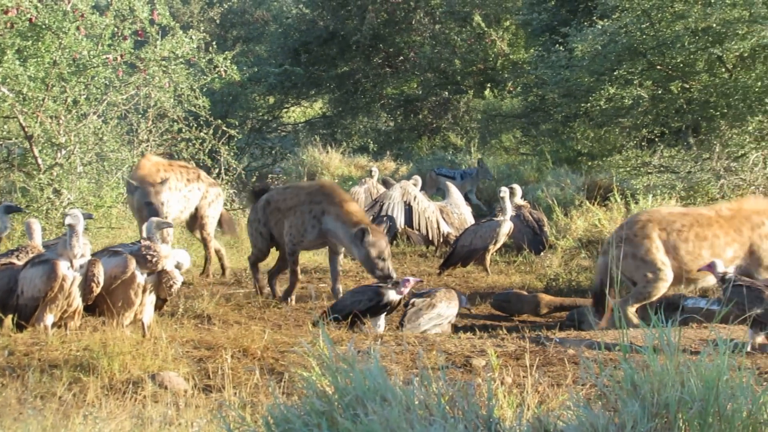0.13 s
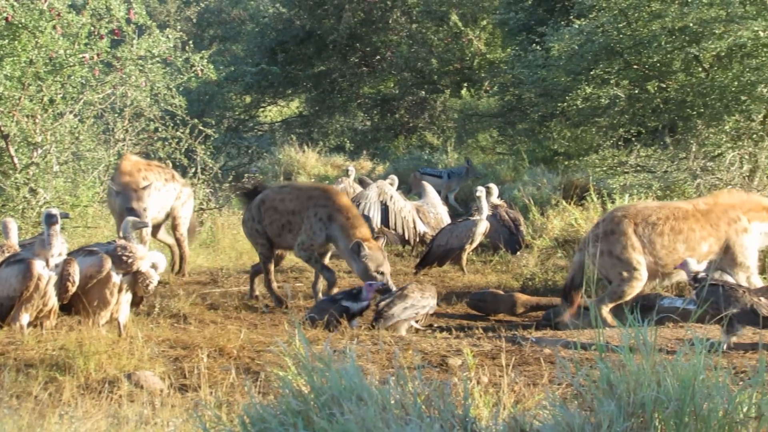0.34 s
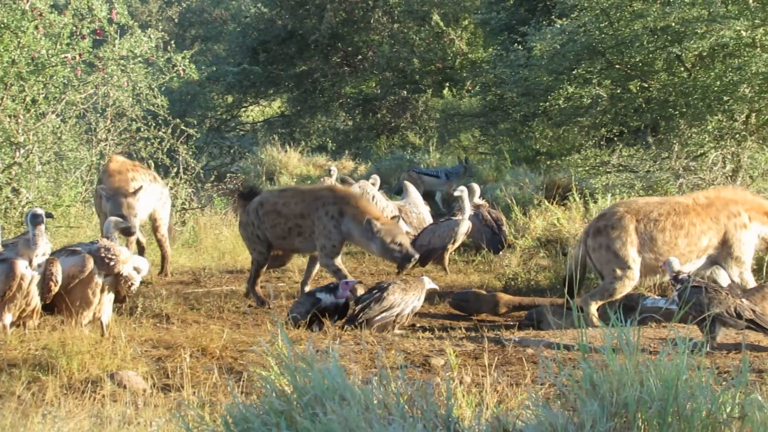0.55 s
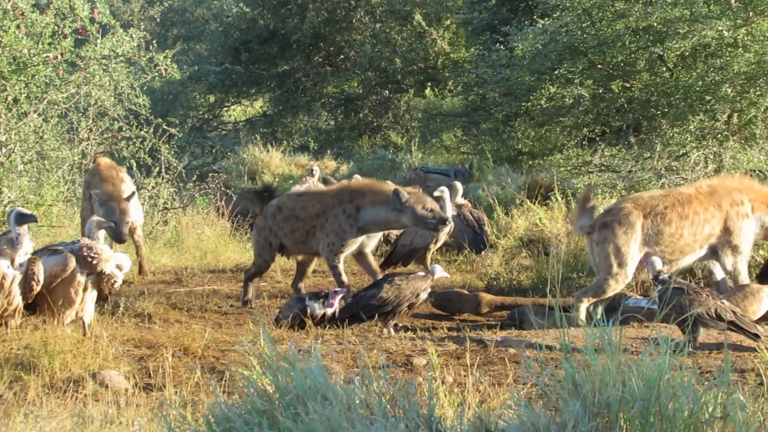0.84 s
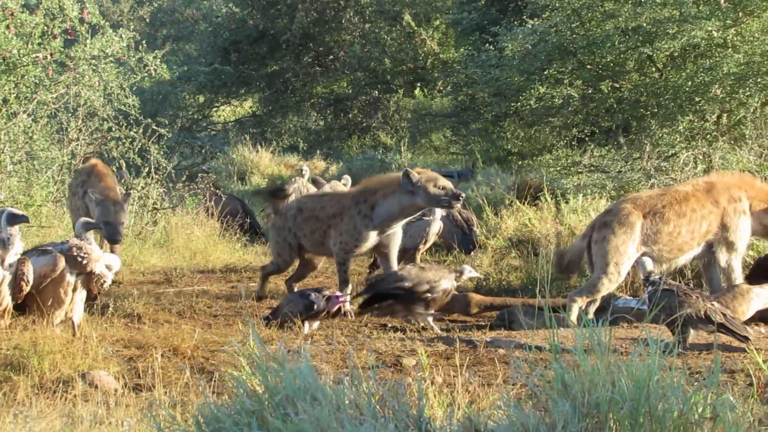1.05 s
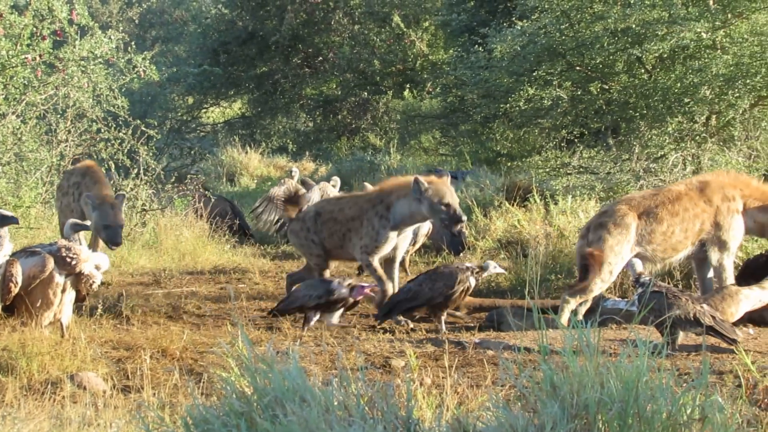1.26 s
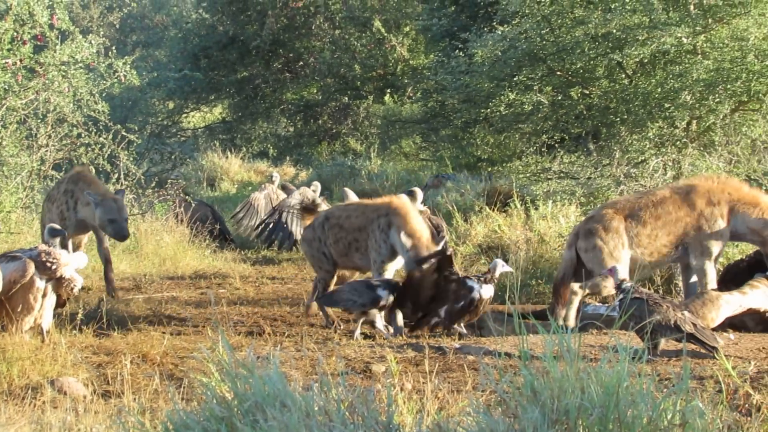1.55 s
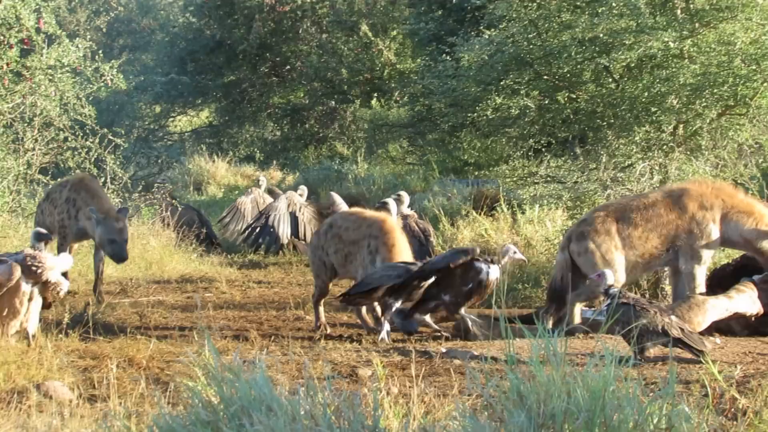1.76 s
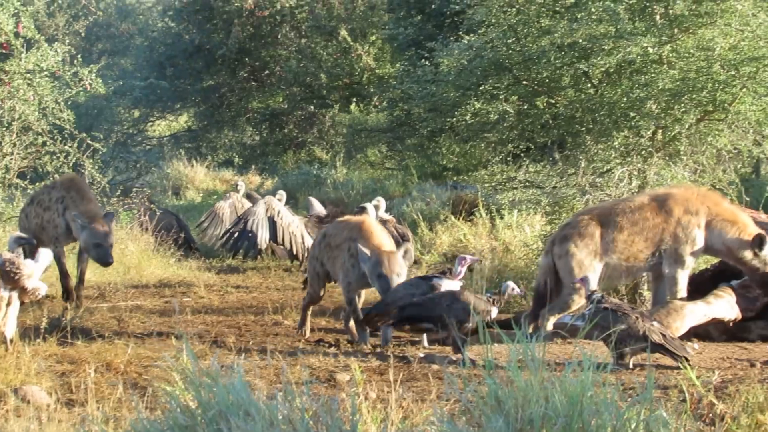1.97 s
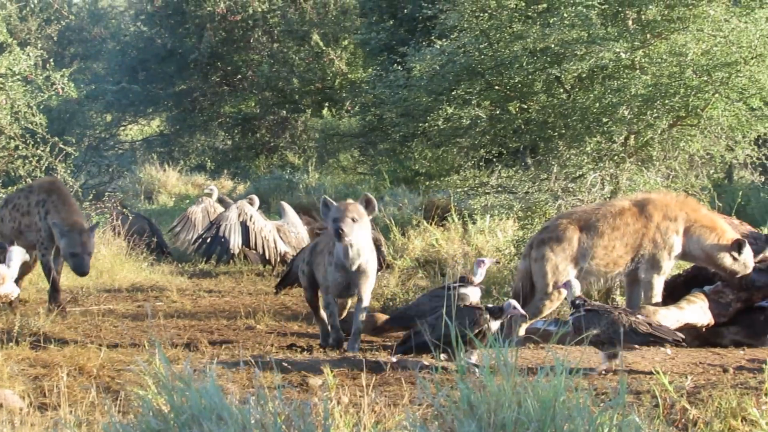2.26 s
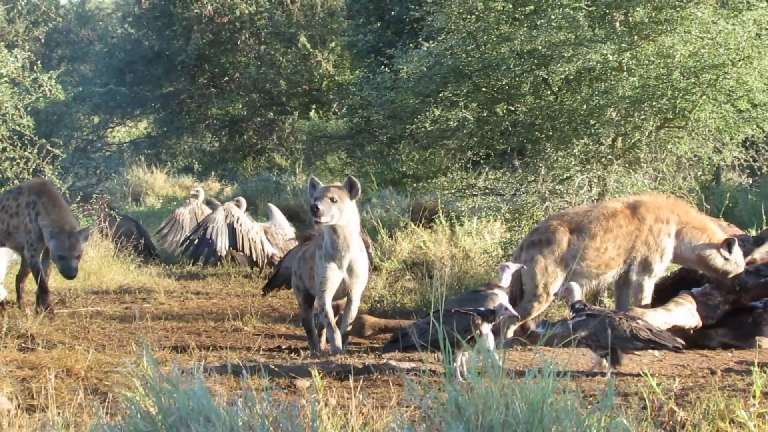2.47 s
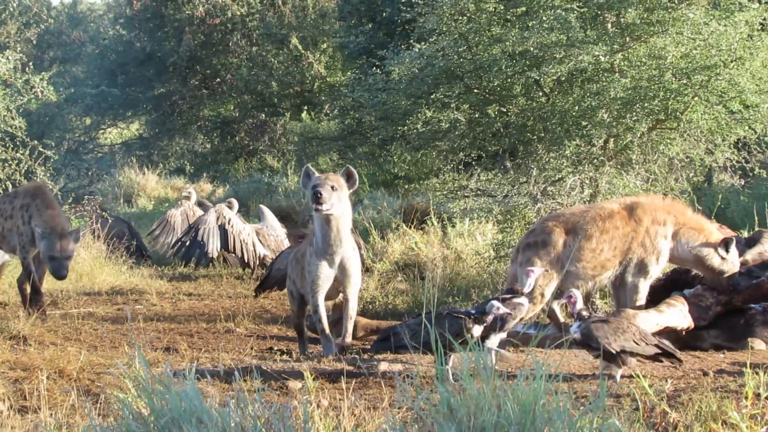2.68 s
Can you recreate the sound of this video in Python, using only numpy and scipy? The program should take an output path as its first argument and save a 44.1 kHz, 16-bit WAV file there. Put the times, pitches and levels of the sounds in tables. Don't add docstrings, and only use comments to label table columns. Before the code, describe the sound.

Vultures squabble at a carcass: beak clicks and thumps, then a quick run of clucks cracking into rasps, airy hisses, sparse distant squawks and a final sharp yelp, in open bush, stereo from some metres.

```python
import sys
import numpy as np
from scipy import signal
from scipy.fft import rfft, irfft
from scipy.io import wavfile
from scipy.ndimage import uniform_filter1d

SR = 44100
rng = np.random.default_rng(int(sys.argv[2]) if len(sys.argv) > 2 else 0)


def field_ratio(decibels):
    return 10 ** (np.asarray(decibels, dtype=float) / 20)


def persist_wave(psi):
    counts = np.round(np.clip(psi, -1, 1) * 32767).astype(np.int16)
    wavfile.write(sys.argv[1], SR, np.atleast_2d(counts).T)


N = 123480
SIDE = np.array([[.5], [-.5]])

# pitch_hz, level_db
SQUAWK_THROAT = [(1000, -13), (1500, -1), (1950, -3.5), (2300, 10), (2700, 11), (3500, 2), (4100, -6.5),
                 (14000, -60)]


def table(points, hz):
    p = np.array(points, float)
    return np.interp(np.log(np.maximum(hz, 1)), np.log(p[:, 0]), p[:, 1])


def unit(x):
    return x / np.sqrt(np.mean(np.abs(x) ** 2))


def walk(rate_hz, n=N):
    k = max(int(SR / rate_hz), 1)
    noise = rng.standard_normal(n + 2 * k)
    smooth = uniform_filter1d(uniform_filter1d(noise, k), k)
    return unit(smooth[k:n + k])


def swell(n, rise, fall):
    u = np.arange(n) / n
    ramp = np.clip(np.minimum(u / rise, (1 - u) / fall), 0, 1)
    return np.sin(np.pi / 2 * ramp) ** 2


def add(out, start_s, x):
    i = int(start_s * SR)
    out[i:i + len(x)] += x[:N - i]


def pan(x, left_minus_right_db):
    return x * field_ratio(left_minus_right_db * SIDE)


def bird(calls, throat, rough, edge, flutter_hz=170, arch_hz=0, fade_db=-4.5):
    out = np.zeros(N)
    k = np.arange(1, 22)[:, None]
    for start, length, first_hz, last_hz, db in calls:
        n = int(length * SR)
        arch = arch_hz * np.sin(np.pi * np.linspace(0, 1, n) ** .5)
        hz = np.linspace(first_hz, last_hz, n) + arch
        phase = k * np.cumsum(hz) / SR + rng.random((21, 1))

        shake = rng.standard_normal((2, 21, 4096))
        shake = uniform_filter1d(shake, int(SR / flutter_hz / 2))[:, :, :n]
        share = rough * (1 + (k * first_hz / 6000 * 2) ** 2) * np.minimum(k / 2, 1) ** 2
        share = np.clip(share, 0, 1)
        gain = np.sqrt(1 - share) + np.sqrt(share) * unit(shake[0] + 1j * shake[1])
        tone = (gain * np.exp(2j * np.pi * phase)).imag.sum(0)

        throat_gain = field_ratio(table(throat, np.fft.rfftfreq(8192, 1 / SR)))
        tone = irfft(rfft(tone, 8192) * throat_gain)[:n]
        fade = fade_db * np.linspace(-.5, .5, n)
        add(out, start, unit(tone) * swell(n, *edge) * field_ratio(db + fade))
    return out


def near_bird():
    # start_s, length_s, first_pitch_hz, last_pitch_hz, level_db
    clucks = [(.408, 0.0145, 795, 812, -32.5), (.472, 0.013, 805, 780, -31.5), (.553, 0.008, 765, 745, -33),
              (.632, 0.013, 735, 745, -34.5), (.343, .007, 800, 780, -36), (.488, .005, 800, 790, -33.5),
              (.652, .008, 735, 715, -35), (.659, .009, 715, 700, -37.5)]
    late_clucks = [
        (.736, 0.018, 692, 678, -35),
        (.834, 0.016, 660, 674, -36.5),
    ]
    last_cluck = [
        (2.4915, 0.0165, 690, 686, -30.5),
        (2.506, 0.016, 750, 710, -36),
        (2.520, 0.017, 710, 685, -40),
    ]
    first_squeal = [(.319, .062, 670, 700, -36)]
    rasps = [(.347, 0.036, 771.4, 745, -44), (.420, 0.017, 743, 714, -38), (.483, 0.026, 798, 743, -38.5),
             (.558, 0.016, 740, 734, -43), (.566, 0.022, 761, 769, -36), (.643, 0.0275, 744, 701, -40),
             (.733, 0.017, 704, 690, -46), (.750, 0.027, 720, 708, -46), (2.505, 0.033, 715.4, 705, -43.5)]
    run_end_rasp = [(.846, 0.05, 683, 648, -42.5)]
    # pitch_hz, level_db
    cluck_throat = [(750, -10.5), (1500, -12), (2350, 7.5), (3100, -6.5), (3800, -13.5), (7000, -22),
                    (9200, -14.5), (14000, -36)]
    late_throat = [(650, -6.5), (1400, -10), (2000, -3.5), (2750, 3.5), (4000, -13), (7500, -19.5),
                   (9300, -6), (14000, -36)]
    last_throat = [(1000, -26.5), (2080, 5), (3450, -22), (4200, -1.5), (4900, -10), (6200, -29.5),
                   (8000, -14), (14000, -36)]
    squeal_throat = [(700, -32), (1600, -11), (2300, 7), (3200, -10.5), (4000, -16), (14000, -48)]
    rasp_throat = [(750, -13.5), (1800, -18.5), (2150, 7), (3000, -4), (3700, -22), (7000, -29),
                   (9200, -20.5), (13000, -40)]

    cluck = dict(rough=.09, edge=(.35, .25))
    rasp = dict(rough=.7, edge=(.15, .3), flutter_hz=260)
    voice = bird(clucks, cluck_throat, fade_db=-3, **cluck)
    voice += bird(late_clucks, late_throat, **cluck)
    voice += bird(last_cluck, last_throat, .06, (.6, .2), fade_db=-.5)
    voice += bird(first_squeal, squeal_throat, .06, (.2, .3), arch_hz=125, fade_db=-2.5)
    voice += bird(rasps, rasp_throat, fade_db=-7, **rasp)
    voice += bird(run_end_rasp, SQUAWK_THROAT, **rasp)
    return voice


def squawks():
    # start_s, length_s, first_pitch_hz, last_pitch_hz, level_db
    far_calls = [(1.375, .09, 528, 603, -47), (1.89, .085, 440.7, 545.6, -45),
                 (2.352, .09, 491, 552, -43.5), (2.455, 0.038, 529, 503, -52.5),
                 (2.55, .035, 536, 517, -54), (1.97, .085, 540, 530, -58) ]
    return bird(far_calls, SQUAWK_THROAT, .38, (.7, .3), arch_hz=25.16, fade_db=-6)


def hisses():
    # start_s, length_s, centre_hz, width_hz, level_db
    breaths = [(1.035, 0.093, 7940, 4540, -42.5), (1.044, 0.084, 3850, 3600, -47),
               (1.101, 0.071, 5630, 3340, -44.5), (1.122, 0.18, 6000, 5000, -54.5),
               (1.211, 0.015, 3500, 11000, -47), (.86, 0.13, 4700, 1500, -57), (2.5, .014, 8450, 4000, -47),
               (2.751, 0.028, 3500, 9300, -48.5), (2.752, .022, 6800, 900, -56),
               (1.03, 0.15, 12000, 5000, -55.5), (2.79, 0.027, 1500, 3000, -53)]
    out = np.zeros((2, N))
    f = np.fft.rfftfreq(8192, 1 / SR)
    for start, length, hz, width_hz, db in breaths:
        n = int(length * SR)
        air = rng.standard_normal((3, 8192))
        spec = rfft(air[0] + 1.16 * air[1:])
        spec /= 1 + np.abs((f - hz) / (width_hz / 2)) ** 3
        air = unit(irfft(spec)[:, :n] * field_ratio(1.4 * walk(58, n)))
        for ch in range(2):
            ear_db = -.95 * (1 + 2 * ch) * (hz > 7000)
            add(out[ch], start, air[ch] * swell(n, .27, .45) * field_ratio(db + ear_db))
    return out


def knocks():
    # start_s, pitch_hz, t60_s (time to die by 60 dB), peak_db
    strikes = [(.001, 514, 0.0089, -34), (.0985, 4560, 0.0032, -31), (0.0985, 2780, 0.0059, -35),
               (0.1425, 4930, 0.0027, -32), (.143, 2700, .006, -33.5), (1.043, 607, 0.026, -42),
               (.172, 7600, .005, -42), (.254, 8400, 0.0045, -41.5), (0.294, 342, 0.032, -39.5),
               (2.316, 7450, .002, -44), (0.1854, 5100, 0.0019, -28), (0.187, 2560, 0.0049, -36.5),
               (0.189, 5460, 0.00097, -33), (0.205, 415, 0.012, -34), (0.2132, 8200, .006, -39.5),
               (0.254, 2800, 0.0097, -33), (0.2534, 915, 0.0031, -25.5), (0.2665, 658, 0.026, -32.5),
               (0.268, 1250, 0.012, -34.5), (0.297, 610, 0.038, -44), (0.625, 510, 0.027, -38.5),
               (0.633, 454, 0.021, -38), (1.886, 2130, 0.0045, -35.5)]
    out, t = np.zeros(N), np.arange(2048) / SR
    for start, hz, t60, db in strikes:
        decay = np.exp(-np.log(1000) * t / t60)
        onset = 1 - np.exp(-t * hz * 4)
        add(out, start, field_ratio(db) * np.sin(2 * np.pi * hz * t) * decay * onset)
    return out


def whistles():
    # start_s, length_s, first_pitch_hz, last_pitch_hz, level_db
    notes_sung = [(.035, .04, 4250, 4150, -60), (.07, .04, 4000, 3600, -64),
                  (.108, .055, 3450, 2400, -56.5), (.155, .05, 2450, 2200, -59),
                  (.012, .045, 7400, 7300, -65), (.28, .035, 4600, 4550, -57),
                  (1.212, .022, 2520, 2480, -55), (1.57, .14, 1900, 1890, -65),
                  (1.96, .135, 3020, 2960, -61), (2.14, .08, 3120, 3200, -66),
                  (2.21, .055, 3330, 3150, -59), (2.08, .09, 2330, 2620, -65), (2.245, .1, 2430, 2670, -62),
                  (2.735, .025, 2550, 2520, -56), (2.755, .03, 3300, 3200, -56),
                  (2.61, .095, 4700, 3450, -63), (1.97, .085, 2700, 2660, -63),
                  (2.055, .075, 3400, 3350, -66), (2.035, .035, 1520, 1450, -64),
                  (1.99, .05, 3550, 3560, -65), (2.265, .045, 3150, 3350, -63)]
    out = np.zeros(N)
    for start, length, first_hz, last_hz, db in notes_sung:
        n = int(length * SR)
        hz = np.geomspace(first_hz, last_hz, n) * (1 + .012 * walk(88, n))
        tone = np.sin(2 * np.pi * np.cumsum(hz) / SR)
        add(out, start, field_ratio(db + 2 * walk(70, n)) * swell(n, .2, .3) * tone)
    return out


def echo(voices):
    t = np.arange(16384) / SR
    tail = rng.standard_normal((2, 16384)) * np.exp(-np.log(1000) * t / .25)
    tail *= t > .008
    tail /= np.sqrt(np.sum(tail[0] ** 2))
    return field_ratio(-15) * signal.fftconvolve(voices[None], tail, axes=1)[:, :N]


def texture(colour, flicker_db, grain_db):
    # pitch_hz, side_minus_mid_db
    bush_side = [(30, 9), (300, 6), (700, 2), (1300, 3), (4000, -4), (14000, -1)]
    f, out = np.fft.rfftfreq(N, 1 / SR), np.zeros((2, N))
    grains = field_ratio(grain_db * np.minimum(rng.exponential(size=N), 5))
    spec = rfft(rng.standard_normal((2, N)) * grains) * field_ratio(table(colour, f))
    spec[1] *= field_ratio(table(bush_side, f))
    for octave in np.arange(4.5, 14.5, .5):
        band = np.clip(1 - 2 * np.abs(np.log2(np.maximum(f, 1)) - octave), 0, 1)
        out += irfft(spec * band, N) * field_ratio(flicker_db * walk(11))
    mid, side = out / np.sqrt(np.mean(out[0] ** 2))
    return np.array([mid + side, mid - side])


def rustle():
    # time_s, level_db
    stirring = [(0, -57.5), (.1, -65), (.2, -53), (.31, -52), (.46, -57), (.63, -51.5), (.8, -54.5),
                (.95, -51), (1.1, -54), (1.35, -56.5), (1.55, -60), (1.75, -58.5), (1.9, -66.5),
                (2.3, -70.5), (2.45, -59), (2.62, -61.5), (2.8, -69.5)]
    # pitch_hz, level_db
    grass_colour = [(1600, -17), (2500, 1), (3200, 0.5), (3750, -1), (4600, 2), (5600, -4), (7000, -6.5),
                    (15000, -24.5)]
    level_db = np.interp(np.arange(N) / SR, *np.array(stirring).T)
    return texture(grass_colour, 1.75, 3.05) * field_ratio(level_db)


def bush():
    # pitch_hz, level_db (per Hz)
    air_colour = [(25, -20.5), (70, -7), (500, -4), (1900, -10.5), (3100, -9.5), (4000, -20), (10000, -22),
                  (15600, -29.5)]
    return texture(air_colour, .92, 1) * field_ratio(-57)


def scene():
    # time_s, left_minus_right_db
    near_pan = [(.33, -4), (.38, -7.5), (.41, -5.5), (.49, -5.5), (.56, -6), (.65, -8), (.74, -8),
                (.88, -10), (2.5, -7.5)]
    # pitch_hz, left_minus_right_db
    ports = [(700, 11.5), (1300, 4.5), (2400, -1.5), (4400, -3.5), (8000, 0.5), (15000, 16)]
    near, far = near_bird(), squawks() + whistles()
    near_pan_db = np.interp(np.arange(N) / SR, *np.array(near_pan).T)
    direct = pan(near, near_pan_db) + pan(far, -9)
    shading_db = table(ports, np.fft.rfftfreq(N, 1 / SR))
    direct = irfft(pan(rfft(direct), shading_db), N)
    direct += pan(knocks(), -2)
    direct[0] = np.roll(direct[0], 1)
    return direct + echo(near + far) + hisses() + rustle() + bush()


def roll_off(x):
    return signal.sosfilt(signal.butter(12, 15750, fs=SR, output="sos"), x)


def record(dry):
    low_pass = signal.ellip(10, .2, 70, 15750, fs=SR, output="sos")
    mix = signal.sosfilt(low_pass, dry)
    return roll_off(mix)


dry = scene()
out = record(dry)
persist_wave(out)
```